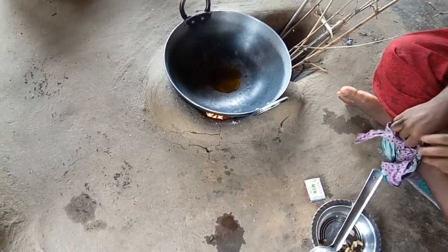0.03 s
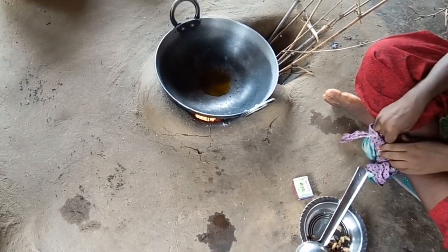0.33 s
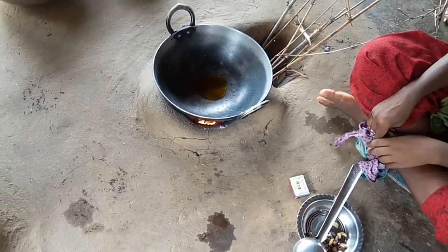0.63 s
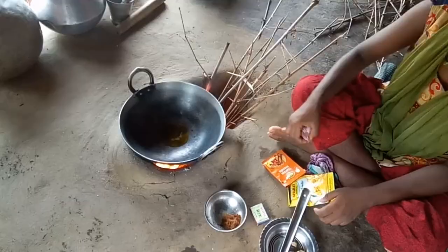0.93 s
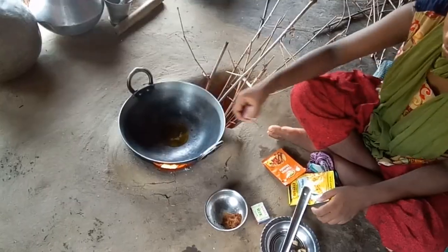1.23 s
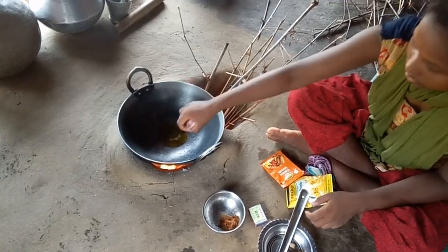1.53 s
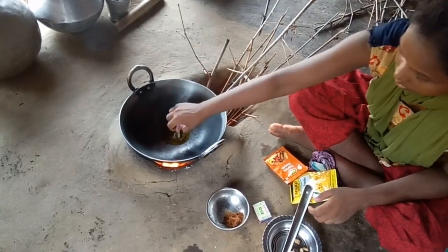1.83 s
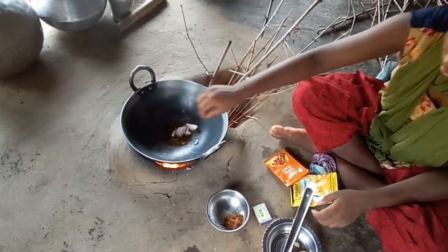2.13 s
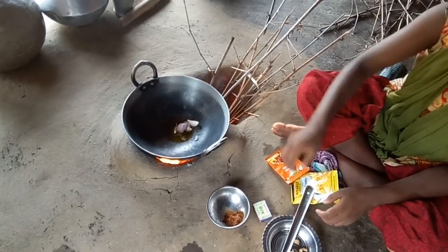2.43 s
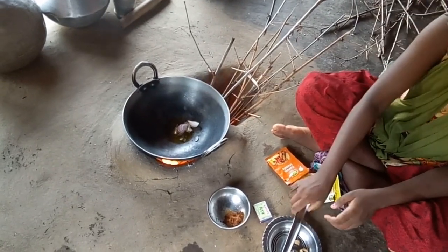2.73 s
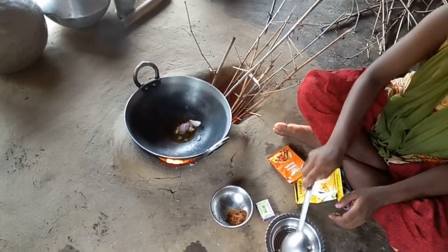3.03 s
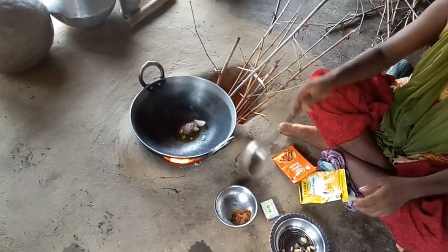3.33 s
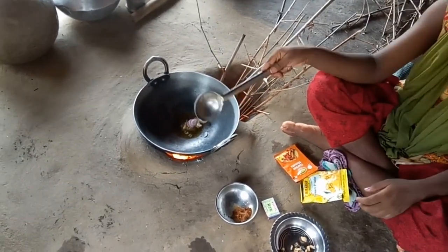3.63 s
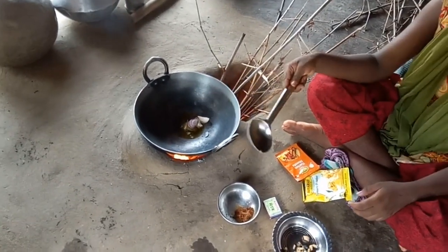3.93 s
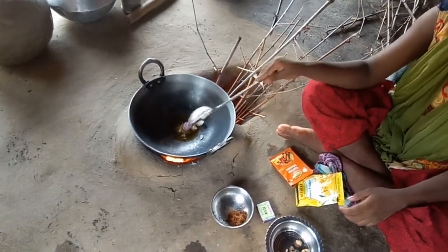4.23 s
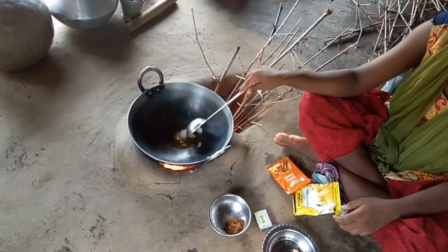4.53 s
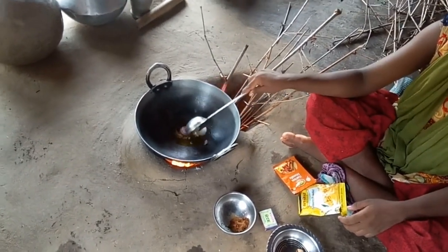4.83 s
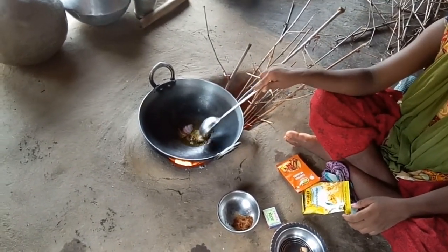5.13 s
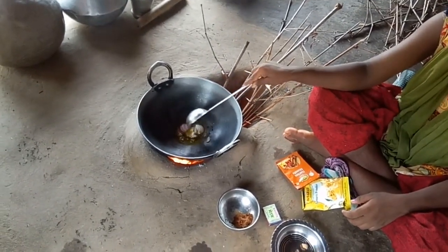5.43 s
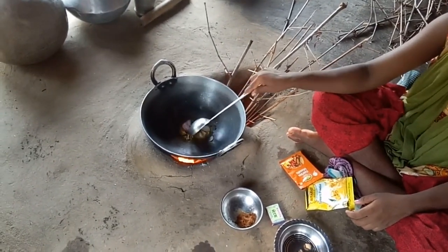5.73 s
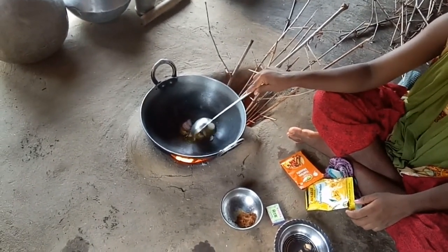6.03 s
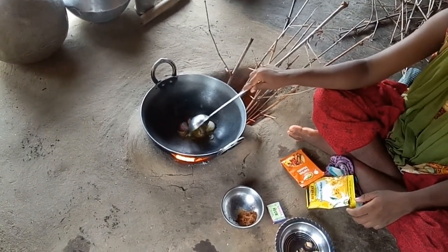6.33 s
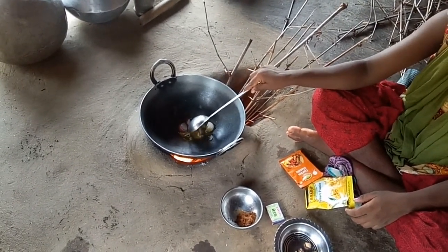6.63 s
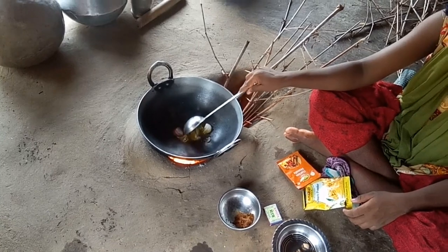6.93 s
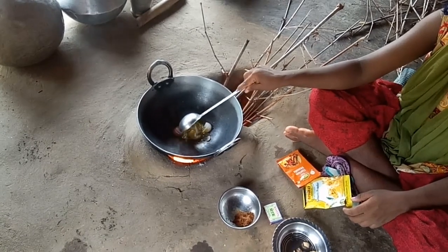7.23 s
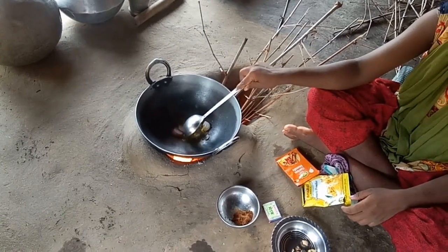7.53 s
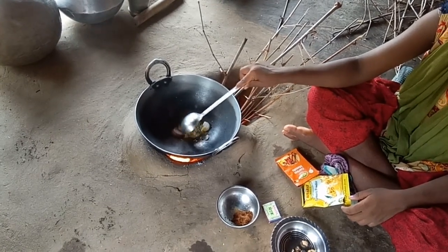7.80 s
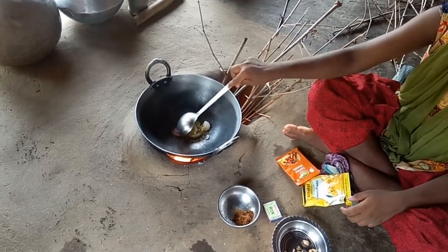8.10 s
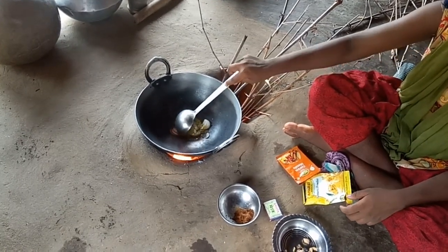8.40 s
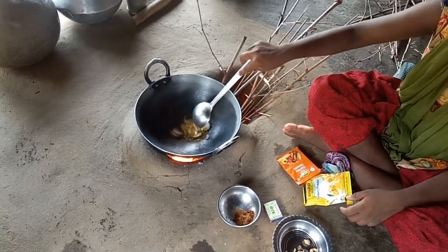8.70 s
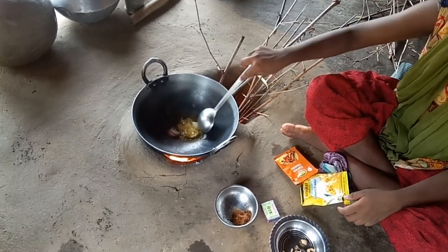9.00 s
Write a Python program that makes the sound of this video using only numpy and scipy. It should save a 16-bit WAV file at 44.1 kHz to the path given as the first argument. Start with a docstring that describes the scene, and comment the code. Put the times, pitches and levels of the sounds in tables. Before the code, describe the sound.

Faint peeping gives way to crackling, spitting oil as food fries, with light scrapes and a few clanks of a metal ladle.

```python
"""A yard, beside a wok of hot oil on a wood-fired clay stove. Chicks peep, birds whistle, insects trill.
Moist food drops in and spits: the harder the oil fries, the denser its bubbles and the louder its stray
pops. A steel ladle presses, scrapes and stirs, so the sizzle swells, and its knocks excite the modes of
wok and ladle. Over the fire's rumble lies a low, wavering hum, perhaps a distant engine or pump.
Once, before the frying begins, the level dips briefly."""
import sys
import numpy as np
from scipy import signal
from scipy.fft import rfft, irfft
from scipy.io import wavfile

SR = 44100
rng = np.random.default_rng(int(sys.argv[2]) if len(sys.argv) > 2 else 0)


def generate_wav(signal):
    """Clip the signal to [-1, 1] and save it as 16-bit WAV at the path in sys.argv[1]."""
    frames = np.transpose(np.atleast_2d(signal))
    scaled = np.clip(frames, -1, 1) * 32767
    pcm = np.round(scaled).astype(np.int16)
    wavfile.write(sys.argv[1], SR, pcm)


N = 399546
TIME = np.arange(N) / SR

# Levels in the tables are relative: each source and the mix apply further gains.
# how hard the oil fries: time_s, fine_db, coarse_db
FRYING_LEVELS = [(2.1, -42, -56.5), (2.78, -43.5, -53.5), (2.93, -43.5, -50), (3.05, -47, -58),
                 (4.5, -46.5, -62), (4.77, -43, -55.5), (4.97, -41, -55.5), (5.26, -36.5, -55.5),
                 (5.5, -39.5, -52), (5.78, -37, -50.5), (6.55, -36, -47), (7.02, -34.5, -49),
                 (7.9, -36, -52), (8.9, -34.5, -50), (9.06, -36, -56)]
# surges of bubbling as the food shifts or the ladle pushes into it: start_s, rise_s, boost_db
BUBBLING_SURGES = [(2.53, 0.023, 4), (3.28, 0.021, 4), (4.48, .09, 15), (4.81, .04, 8), (5.6, .025, 5)]
# spectra of fine sizzle, coarse bubbling and dry cracks: frequency_hz, level_db
FINE_SPECTRUM = [(1200, -33.5), (2400, -10.5), (3200, -0.5), (5200, -3.5), (6700, -3), (7700, -8),
                 (9200, -2.5), (11000, -12.5), (13000, -21), (16000, -17)]
COARSE_SPECTRUM = [(200, -18), (450, -14.5), (750, -8), (1020, -8.5), (1350, -5), (1900, 3.5), (2400, -3),
                   (3300, -17)]
CRACK_SPECTRUM = [(150, -12), (450, -12.5), (700, -1.5), (1100, -1), (2000, 6.5), (3600, 8.5), (6000, -1),
                  (10000, -0.5), (16000, -24)]
# water drops bursting in the oil: start_s, level_db, pitch_hz, click_db, ring_t60_s, spray_db
DROP_POPS = [(1.898, -20, 4870, 3, 0.025, -16), (2.112, -12.5, 5180, 7, 0.032, -27),
             (2.1855, -21.5, 8000, 12, .008, -13), (2.2181, -13.5, 3700, 13, 0.008, -25),
             (2.249, -21.5, 6700, -16, .0065, -20), (2.2903, -16, 3600, 0, 0.007, -19),
             (2.414, -19.5, 5530, 11, .01, -20), (2.453, -20, 4420, 4, 0.017, -26),
             (2.5393, -24.5, 5500, 3, .012, -16), (2.6583, -25, 4000, 14, .008, -18),
             (2.757, -29, 4500, 1, .012, -13), (3.066, -28.5, 8550, -1, 0.013, -14.5),
             (3.182, -24.5, 5460, -4, 0.0088, -21), (3.405, -27, 6200, 10, 0.0091, -16),
             (3.527, -26, 6000, 1, .01, -8.5), (4.007, -25.5, 8650, -5, .005, -14.5),
             (4.103, -27, 6000, -17, .008, -18), (4.232, -29, 5700, 14, .01, -14.5),
             (4.2836, -23, 6450, 37, .013, -19.5), (4.427, -27.5, 6020, -19, 0.034, -11.5),
             (4.722, -22, 6640, 1, 0.012, -24), (4.8698, -20.5, 7000, 8, 0.0058, -18),
             (5.055, -17, 7100, -13, 0.0082, -21), (5.39, -16.5, 5400, -12, 0.021, -22),
             (5.44, -16, 3920, 6.5, 0.034, -28), (5.6118, -17, 5570, -1, 0.009, -13),
             (6.0009, -13.5, 4600, -9, 0.011, -16.5), (6.053, -14.5, 3250, -4, 0.035, -12.5),
             (6.1182, -13.5, 5200, 2, 0.0073, -19), (6.3432, -15.5, 4520, -3, 0.013, -15.5),
             (6.387, -17, 4800, -3, 0.011, -24), (6.667, -12.5, 3900, 0, 0.014, -18),
             (6.7892, -17, 4560, 9, 0.014, -34), (6.82, -15, 4570, 4, 0.014, -22),
             (7.195, -16, 3280, -2, 0.03, -23), (7.607, -17.5, 4220, -2, .015, -15),
             (8.15, -15, 5250, 1, 0.04, -21), (8.182, -19, 5500, -10, .012, -15),
             (8.865, -18.5, 4100, -8, .018, -15)]
# wet squelches of the food and a few short, lower ladle scrapes: middle_s, length_s, pitch_hz, level_db
SQUELCHES_AND_SCRAPES = [(2.264, .028, 7000, -35), (3.815, 0.033, 5760, -41.5), (4.288, 0.024, 6800, -27),
                         (4.933, 0.049, 4670, -34), (5.064, 0.037, 6500, -29), (4.704, 0.027, 6360, -34),
                         (5.738, .08, 6300, -31), (5.96, .03, 5700, -29), (5.252, 0.044, 5160, -33),
                         (5.649, 0.038, 4800, -30), (6.252, 0.051, 5340, -29), (6.44, 0.02, 1900, -35.5),
                         (6.691, .047, 3560, -27), (6.983, 0.063, 4630, -27), (7.064, 0.024, 2300, -36),
                         (7.156, .04, 3870, -30.5), (7.29, .035, 5140, -30.5), (7.342, .025, 5100, -28),
                         (7.548, 0.025, 3500, -22), (7.592, 0.055, 3580, -26.5), (7.783, 0.023, 4640, -24),
                         (8.023, 0.06, 4860, -31), (8.346, 0.019, 4140, -23), (8.389, .04, 4950, -31),
                         (8.642, 0.034, 4400, -30), (8.699, .037, 4930, -27.5), (8.885, 0.019, 2000, -36)]
# dry, broadband cracks: start_s, level_db
DRY_CRACKS = [(2.218, -18.5), (2.5448, -17), (2.606, -19.5), (2.6593, -15), (2.8107, -11.5), (4.1213, -23),
              (5.0717, -13.5), (5.665, -24), (6.79, -24), (6.8937, -18), (7.066, -29), (7.3248, -11.5),
              (7.9059, -12), (8.283, -13.5), (9.0432, -20.5)]
# bright snaps of oil film: start_s, level_db, pitch_hz
FILM_SNAPS = [(2.025, -21, 7500), (2.171, -27, 14100), (2.196, -18, 8000), (2.476, -23, 7900),
              (2.602, -19, 7700), (2.625, -19, 6000), (2.708, -16.5, 11000), (2.869, -19, 6300),
              (2.928, -21, 6500), (3.0, -25, 9500), (3.294, -25.5, 3900), (3.316, -29, 5300),
              (3.434, -32, 5500), (4.02, -31, 8100), (4.174, -24.5, 7300), (4.471, -23.5, 8300),
              (4.481, -24, 8800), (4.804, -20, 7300), (4.827, -19, 6000), (5.3664, -17, 5500),
              (6.1646, -8, 7000), (6.5643, -18, 5100), (6.9686, -15, 5000), (7.92, -18, 5700),
              (8.0498, -16, 5700), (8.551, -20, 5600)]
# resonances of the wok's bowl: centre_hz, width_hz, gain_db
BOWL_RESONANCES = [(662, 67, -4.5), (791, 51, -2.5), (1297, 156, -0.5), (3700, 150, -11), (4560, 220, -3),
                   (5340, 590, -0.5), (6450, 530, -5)]
# knocks of steel on wok or plate:
# start_s, wok_db, ladle_db, favoured_wok_hz, favoured_ladle_hz, rebound_delay_s, rebound_db
LADLE_KNOCKS = [(2.811, -50, -52, 662, 3700, .005, -15), (3.573, -81, -33.5, 800, 3790, .0022, -6),
                (6.5944, -35.5, -33, 960, 3400, .008, -22), (7.673, -27.5, -29.5, 1290, 3660, .0043, -4),
                (8.9425, -31.5, -30.5, 1684, 3980, .0052, -4), (8.992, -74, -40.5, 1690, 3300, .0055, -5)]
# modes of the wok, damped by its clay seat, and of the hand-held ladle: pitch_hz, level_db, t60_s
WOK_MODES = [(169, -10.5, 0.053), (290, -6, 0.026), (427, -13.5, .06), (662, -2.5, .045), (735, -1, 0.026),
             (796, 2, 0.046), (880, -5, .02), (960, -12, .12), (1080, -7, .025), (1280, -3, .04),
             (1340, -6.5, .035), (1517, -1.5, .04), (1630, 4, 0.015), (1703, -10, 0.12), (1727, -4.5, .05),
             (1936, -3.5, 0.036), (2590, -3.5, 0.038)]
LADLE_MODES = [(3160, 2, .045), (3275, 5, 0.029), (3430, 4, .022), (3700, 2, 0.043), (3820, 7.5, 0.019),
               (4100, -8, 0.12), (4540, 0, .022), (4800, 6, 0.028), (6640, -4, .05), (7350, -1, 0.02)]
# spectrum of the wok jolting in its seat: frequency_hz, level_db
SEAT_SPECTRUM = [(130, -10), (250, -2), (380, -4.5), (550, -2), (750, 1.5), (1050, -7.5), (1600, -2.5),
                 (2800, -13.5), (4000, -22)]
# modes of a steel plate: centre_hz, width_hz, gain_db
PLATE_MODES = [(1976, 10, -4), (3410, 10, 0), (3720, 40, 0), (4720, 20, -1), (5150, 20, -5), (5930, 15, 0),
               (6500, 260, -11)]
# joint strength of the fire's rumble and the hum: time_s, level_db
RUMBLE_LEVELS = [(0.0, -69.5), (0.48, -74), (1.16, -69.5), (1.34, -65.5), (1.82, -65.5), (2.07, -62.5),
                 (4.77, -62.5), (5.02, -60), (5.7, -65), (6.0, -67), (6.4, -67), (7.33, -66.5), (7.55, -59),
                 (7.72, -60), (7.9, -64.5), (8.58, -60), (9.06, -62)]
# spectrum of the flames: frequency_hz, level_db
FLAME_SPECTRUM = [(25, -12), (55, -10), (85, -6), (115, -2), (143, -6.5), (175, -0.5), (220, -6.5),
                  (310, -10.5), (420, -21), (800, -47)]
# pitches of a low, wavering hum, perhaps a distant engine or pump: centre_hz, width_hz, gain_db
HUM_BANDS = [(94.5, 5.2, 5), (130.5, 4.4, 15), (143.9, 5.3, 15.5), (159.2, 5.3, 8), (176.3, 4.5, 8),
             (337, 25, -0.5)]
# falling peeps of chicks, flatter whistles of far birds: middle_s, length_s, start_pitch_hz, level_db
CHICK_PEEPS = [(0.0, 0.057, 3070, -51.5), (.05, 0.091, 2640, -62), (.228, 0.063, 3216, -49.5),
               (.445, .09, 3240, -55), (.704, 0.098, 3410, -55.5)]
BIRD_WHISTLES = [(.362, 0.03, 3170, -60.5), (.588, 0.059, 2040, -56), (1.223, 0.16, 1713, -66.5),
                 (1.485, 0.23, 3000, -67.5), (1.655, 0.18, 4030, -66.5)]
# partials of a raspy call, whose cycles alternate strong and weak: pitch_ratio, level_db
RASP_PARTIALS = [(.5, -19), (1.5, 0.5), (2, -0.5), (2.5, -11), (3, -7)]
# soft low blips and duller bumps: middle_s, pitch_hz, level_db
SOFT_BLIPS = [(3.712, 600, -58), (3.845, 513, -60.5), (3.885, 674, -66), (3.932, 590, -61)]
DULL_BUMPS = [(1.4, 248, -59.5), (1.95, 328, -59.5), (2.635, 188, -50), (3.24, 318, -59.5),
              (3.38, 320, -62), (5.64, 318, -59.5), (5.69, 180, -52), (6.0, 290, -55), (6.9, 295, -58.5)]
# trills of insects: centre_hz, width_hz, level_db, throb_hz, start_s
INSECT_TRILLS = [(9500, 640, -80.5, 7.4, 0), (8500, 110, -91, 7.3, 0.76)]
# strength of the yard's ambient noise: time_s, level_db
YARD_LEVELS = [(0, -71.5), (.9, -69.5), (1.1, -71.5), (1.8, -69), (9.06, -77)]
# spectrum of that noise: frequency_hz, level_db
YARD_SPECTRUM = [(180, -14), (300, -3.5), (1810, -9.5), (2930, -6), (3520, -11.5), (5430, -7),
                 (7820, -19.5), (9550, -14), (10600, -24), (15000, -31), (16000, -28)]
# spectral weighting of the stereo side signal: frequency_hz, gain_db
SIDE_SPECTRUM = [(3000, -79), (4200, -69), (5200, -66), (8000, -59), (16000, -30)]

DRIPS_S, LANDS_S, STIR_S = 1.81, 1.936, 4.5  # water drips in, the food lands, stirring begins


def sizzle(base_per_s=5000, base_db=-36, doubling_db=5.5, crisp_db=5.5, dulling_db_per_s=1):
    """Bubble resonance: over a steam hiss, bubbles burst in clumps; small ones ring high, large low."""
    fine_db, coarse_db = frying_levels()
    clumping = from_db(1.67 * drift(22))
    per_s = base_per_s * 2 ** ((fine_db - base_db) / doubling_db) * clumping
    hiss = from_db(-5) * rng.standard_normal(N)
    small = bubbles(grains(per_s * 1.5, spread_db=4.5), 2065, 13950, q=8.2, sizes=20)
    ticks = from_db(-4) * rms_one(grains(per_s * .37, spread_db=2))
    spits = from_db(-4) * bubbles(grains(per_s * .02, spread_db=1.5), 3010, 7020, q=17, sizes=16)
    spits *= from_db(-10 * (TIME < STIR_S))
    crackle = from_db(-6.5) * rms_one(grains(110, spread_db=2.5))
    large = bubbles(grains(per_s * .6, spread_db=3.5), 540, 2770, q=3, sizes=12)
    fine = rms_one(colour(small + crackle + ticks + hiss, FINE_SPECTRUM))
    coarse = rms_one(colour(large + ticks + hiss, COARSE_SPECTRUM))
    # once stirred, the food slowly covers the oil and dulls the treble
    treble = signal.sosfilt(signal.butter(1, 9000, "high", fs=SR, output="sos"), fine)
    treble_gain = from_db(crisp_db - dulling_db_per_s * np.maximum(TIME - STIR_S, 0))
    fine = fine + (treble_gain - 1) * treble + spits
    return from_db(fine_db) * fine + from_db(coarse_db + .5) * coarse


def frying_levels(drips_db=-6.5, flare_db=8.5, flare_s=.073, surge_decay_s=.125, fine_share=.54):
    """Boiling sets the fine and coarse levels (dB): first drips, a flare as food lands, then surges."""
    wet = np.clip((TIME - DRIPS_S) / .02, 1e-4, 1)
    landed = np.clip((TIME - LANDS_S) / .035, 0, 1)
    onset = 20 * np.log10(wet) + drips_db * (1 - landed)
    flare = flare_db * landed * np.exp(-np.abs(TIME - LANDS_S) / flare_s)
    surge = 0
    for s, rise_s, db in BUBBLING_SURGES:
        subsiding = np.exp(-np.maximum(TIME - s - rise_s, 0) / surge_decay_s)
        surge += db * np.clip((TIME - s) / rise_s, 0, 1) * subsiding
    fine, coarse = curves(FRYING_LEVELS)
    return fine + onset + flare + fine_share * surge, coarse + onset - flare + surge


def bubbles(clicks, low_hz, high_hz, q, sizes):
    """Impulse excitation: each click rings one bubble, whose randomly chosen size sets its pitch."""
    size = rng.integers(0, sizes, N)
    pitches = np.geomspace(low_hz, high_hz, sizes)
    return rms_one(sum(resonance(clicks * (size == k), hz, hz / q) for k, hz in enumerate(pitches)))


def pops(level_db=4.5, stray_click_db=10, stray_t60=.011, stray_spray_db=-13, spray_t60=.064):
    """Cavity resonance: a drop bursts with a click, its cavity rings, and a spray of droplets follows."""
    out, t = np.zeros(N), np.arange(4096) / SR
    lesser = strays(LANDS_S, per_s=6, over_db=10, spread_db=9.5)
    lesser = [(*row, stray_click_db, stray_t60, stray_spray_db) for row in lesser]
    for s, db, hz, click_db, t60, spray_db in DROP_POPS + lesser:
        cavity = np.sin(2 * np.pi * hz * t) * decay(t, t60)
        rupture = (t == 0) + 1.1 * rng.standard_normal(len(t)) * decay(t, .0027)
        click = resonance(colour(rupture, FINE_SPECTRUM), hz, 2800)
        burst = peak_one(cavity + 2 * from_db(click_db) * peak_one(click))
        droplets = double_resonance(rng.standard_normal(len(t)) ** 3, hz, 5300)
        spray = from_db(spray_db + 1.5) * rms_one(droplets) * decay(t, spray_t60)
        add(out, s + .001019, from_db(db + level_db) * (burst + spray))
    return low_cut(out, hz=1200)


def squelches_and_scrapes(level_db=1.5, q=3.6, rough_db=5, stray_length_s=.036):
    """Band-limited noise in sputtering swells: wet squelches of food and a few lower ladle scrapes."""
    out = np.zeros(N)
    lesser = strays(STIR_S, per_s=3, over_db=3, spread_db=2, low_hz=3500, high_hz=6030)
    lesser = [(s, stray_length_s, hz, db) for s, db, hz in lesser]
    for s, length_s, hz, db in SQUELCHES_AND_SCRAPES + lesser:
        swell = np.hanning(round(length_s * SR))
        sputter = rng.standard_normal(8192) * from_db(rough_db * np.repeat(rng.standard_normal(256), 32))
        band = resonance(resonance(sputter, hz, hz / q), hz, hz / 2)
        add(out, s - length_s / 2, from_db(db + level_db) * swell * rms_one(band[:len(swell)]))
    return out


def cracks(level_db=2.5):
    """A brief impulse has a broad spectrum: dry cracks in the oil reach down into the middle range."""
    out, t = np.zeros(N), np.arange(1024) / SR
    lesser = strays(LANDS_S, per_s=2.5, over_db=12.5, spread_db=10)
    for s, db in DRY_CRACKS + list(lesser[:, :2]):
        impulse = (t == 0) + .15 * rng.standard_normal(len(t)) * decay(t, .005)
        add(out, s + .001026, from_db(db + level_db) * peak_one(colour(impulse, CRACK_SPECTRUM)))
    return out


def snaps(level_db=3, width_hz=6000, tear_t60=.0074):
    """Film rupture: thin films of oil snap, each a bright tick with a brief tearing tail."""
    out, t = np.zeros(N), np.arange(512) / SR
    lesser = strays(LANDS_S, per_s=20, over_db=10.5, spread_db=8, low_hz=3000, high_hz=9800)
    for s, db, hz in FILM_SNAPS + list(lesser):
        rupture = (t == 0) + .3 * rng.standard_normal(len(t)) * decay(t, tear_t60)
        add(out, s, from_db(db + level_db) * peak_one(resonance(rupture, hz, width_hz)))
    return out


def strays(start_s, per_s, over_db, spread_db, low_hz=3600, high_hz=8000):
    """A random point process of bursts that grow louder with the sizzle: time_s, level_db, pitch_hz."""
    when, size, pitch, chance = rng.random((256, 4)).T
    span_s = TIME[-1] - start_s
    s = start_s + when * span_s
    db = np.interp(s, TIME, frying_levels()[0]) + over_db + spread_db * (size - .5)
    hz = low_hz * (high_hz / low_hz) ** pitch
    return np.transpose([s, db, hz])[chance < per_s * span_s / len(s)]


def ladle_knocks(rebound_thud_db=-12):
    """Impact: each knock rings wok and ladle, crushes food, jolts the wok's seat and rebounds once."""
    out, t = np.zeros(N), np.arange(SR // 2) / SR
    for s, wok_db, ladle_db, wok_hz, ladle_hz, rebound_s, rebound_db in LADLE_KNOCKS:
        for after_s, db, thud_db in (0, 0, 0), (rebound_s, rebound_db, rebound_thud_db):
            noise = rng.standard_normal((3, len(t)))
            grit = from_db(-1) * rms_one(colour(noise[0], CRACK_SPECTRUM)) * decay(t, .072)
            jolt = from_db(2.5) * rms_one(colour(noise[1], SEAT_SPECTRUM)) * decay(t, .058)
            scuff = rms_one(resonance(noise[2], 4900, 2300)) * decay(t, .033)
            wok = struck(WOK_MODES, t, wok_hz, favour_db=4.5, reach=.035, sustain=.64)
            ladle = struck(LADLE_MODES, t, ladle_hz, favour_db=7.5, reach=.052, sustain=.11)
            thud = from_db(wok_db + thud_db) * low_cut(wok + grit + jolt, hz=170)
            ring = from_db(ladle_db) * low_cut(ladle + scuff, hz=2370)
            add(out, s + after_s, from_db(db) * (thud + ring))
    return out


def struck(modes, t, favoured_hz, favour_db, reach, sustain):
    """Modal superposition: the modes that the point of contact favours ring louder and longer."""
    out = 0
    for k, (hz, db, t60) in enumerate(modes):
        favoured = np.exp(-(np.log(hz / favoured_hz) / reach) ** 2)
        strength = (-1) ** k * from_db(db + rng.normal(0, 1) + favour_db * favoured)
        out += strength * np.sin(2 * np.pi * hz * t) * decay(t, t60 * (1 + sustain * favoured))
    return out


def ladle_slide(start_s=2.884, level_db=-31, attack_s=.005, t60=.18):
    """Friction: the ladle slides off the steel plate, exciting its modes, and the rubbing dies away."""
    out, t = np.zeros(N), np.arange(SR // 2) / SR
    friction = grains(3000, spread_db=2)
    scrape = from_db(-21) * resonance(friction, 4800, 5000)
    slide = rms_one(resonators(friction, PLATE_MODES) + scrape)
    envelope = np.minimum(t / attack_s, 1) * decay(t, t60)
    add(out, start_s, from_db(level_db) * slide[-len(t):] * envelope)
    return out


def fire_and_hum(level_db=2.5, flutter_db=2, hum_share=.74):
    """Beating: a low hum of close pitches, perhaps a far engine or pump, wavers over the fire's rumble."""
    strength_db, = curves(RUMBLE_LEVELS)
    rumble = colour(rng.standard_normal(N), FLAME_SPECTRUM)
    hum_gain = from_db(hum_share * (strength_db - strength_db.max()))
    hum = hum_gain * resonators(rumble, HUM_BANDS)
    return from_db(strength_db + level_db + flutter_db * drift(25)) * rms_one(rumble + hum)


def birds(bend=1.6, hoarseness=1.35):
    """Period doubling: half-order partials roughen each call, a wavering tone that falls ever faster."""
    out = np.zeros(N)
    waver = 1 + .035 * drift(260)
    tremble = from_db(2.5 * drift(150))
    roughness = 1 + hoarseness * drift(350)
    for calls, fall, rasp_db in (CHICK_PEEPS, .39, -18.5), (BIRD_WHISTLES, .089, -34):
        for s, length_s, hz, db in calls:
            progress = np.linspace(0, 1, round(length_s * SR))
            now = round(s * SR) + np.arange(len(progress))
            pitch_hz = hz * (1 - fall * progress ** bend) * waver[now]
            phase = 2 * np.pi * np.cumsum(pitch_hz) / SR
            rasp = sum(from_db(rasp_db + part_db) * np.sin(k * phase) for k, part_db in RASP_PARTIALS)
            tone = np.sin(phase) + roughness[now] * rasp
            call = from_db(db) * tone * tremble[now] * np.sin(np.pi * progress) ** 2
            already_sung = max(0, round((length_s / 2 - s) * SR))
            add(out, s - length_s / 2, call[already_sung:])
    return out + reflections(out, t60=.2, wet_db=-4)


def blips(length_s=.035, width_hz=140):
    """Narrow-band noise has a vague pitch: short swells of it are heard as dull blips and bumps."""
    out, swell = np.zeros(N), np.hanning(round(length_s * SR))
    for s, hz, db in SOFT_BLIPS + DULL_BUMPS:
        band = double_resonance(rng.standard_normal(SR // 4), hz, width_hz)
        add(out, s - length_s / 2, from_db(db) * swell * rms_one(band[-len(swell):]))
    return out


def insects(throb_depth=.56):
    """Stridulation: far insects make narrow bands of noise that throb in amplitude."""
    out = np.zeros(N)
    for hz, width_hz, db, throb_hz, start_s in INSECT_TRILLS:
        band = rms_one(double_resonance(rng.standard_normal(N), hz, width_hz))
        throb = 1 + throb_depth * np.sin(2 * np.pi * throb_hz * TIME + drift(6.1))
        out += from_db(db) * band * throb * (TIME > start_s)
    return out


def yard_air():
    """Ambient noise: the air of the yard is a faint broadband hush of slowly varying level."""
    level_db, = curves(YARD_LEVELS)
    return from_db(level_db) * rms_one(colour(rng.standard_normal(N), YARD_SPECTRUM))


def reflections(x, t60, wet_db, gap_s=.0017):
    """Reverberation: dense echoes from the ground and nearby walls decay exponentially."""
    t = np.arange(SR // 2) / SR
    tail = rng.standard_normal(len(t)) * decay(t, t60) * (t > gap_s)
    return from_db(wet_db) * signal.oaconvolve(x, tail / np.linalg.norm(tail))[:N]


def grains(per_s, spread_db):
    """Shot noise: random clicks of either sign and very uneven size."""
    out = np.zeros(N)
    at = np.flatnonzero(rng.random(N) < per_s / SR)
    size = from_db(spread_db * np.minimum(rng.exponential(1, N)[at], 5))
    out[at] = size * np.sign(rng.random(N)[at] - .5)
    return out


def drift(rate_hz, step=40):
    """Low-passed noise: a slow random fluctuation with rms near 1."""
    pole = np.exp(-2 * np.pi * rate_hz * step / SR)
    noise = rng.standard_normal(N // step + 2002)
    slow = signal.lfilter([1], [1, -2 * pole, pole * pole], noise)[2000:]
    return np.interp(np.arange(N) / step, np.arange(len(slow)), rms_one(slow))


def colour(x, spectrum, size=4096):
    """Minimum-phase filtering to a spectrum, falling 12 dB per octave beyond its ends."""
    hz, db = np.transpose(spectrum)
    log_hz = np.log(np.maximum(np.arange(size // 2 + 1), .5) * SR / size)
    skirts = np.maximum(np.log(hz[0]) - log_hz, 0) + np.maximum(log_hz - np.log(hz[-1]), 0)
    cepstrum = irfft(np.log(from_db(np.interp(log_hz, np.log(hz), db))) - 2 * skirts)
    cepstrum[1:size // 2] *= 2  # folding the cepstrum makes the response causal
    cepstrum[size // 2 + 1:] = 0
    return signal.oaconvolve(x, irfft(np.exp(rfft(cepstrum))))[:len(x)]


def resonance(x, hz, width_hz):
    """A damped oscillator: a band-pass with unit gain at its peak."""
    r = np.exp(-np.pi * width_hz / SR)
    feedback = [1, -2 * r * np.cos(2 * np.pi * hz / SR), r * r]
    return signal.lfilter(np.array([1, 0, -1]) * (1 - r * r) / 2, feedback, x + 1e-18)


def double_resonance(x, hz, width_hz):
    """Two equal resonators in series give steeper skirts."""
    return resonance(resonance(x, hz, width_hz), hz, width_hz)


def resonators(x, modes):
    """Resonators in parallel: their responses add."""
    return sum(from_db(db) * resonance(x, hz, width_hz) for hz, width_hz, db in modes)


def low_cut(x, hz):
    """Radiation efficiency: a small body radiates little bass."""
    return signal.sosfilt(signal.butter(2, hz, "high", fs=SR, output="sos"), x + 1e-18)


def decay(t, t60):
    """Exponential damping by 60 dB in t60 seconds."""
    return np.exp(-np.log(1000) * t / t60)


def from_db(db):
    """Decibels to amplitude ratio."""
    return 10 ** (np.asarray(db) / 20)


def rms_one(x):
    """Normalisation to rms 1."""
    return x / np.sqrt(np.mean(x ** 2) + 1e-20)


def peak_one(x):
    """Normalisation to peak 1."""
    return x / np.abs(x).max()


def curves(rows):
    """Linear interpolation of each level column at every sample."""
    s, *columns = np.transpose(rows)
    return [np.interp(TIME, s, column) for column in columns]


def add(out, start_s, sound):
    """Superposition of a sound from start_s onward."""
    at = max(0, round(start_s * SR))
    out[at:at + len(sound)] += sound[:max(0, N - at)]


def scene():
    """Superposition: frying resonates in the bowl and joins the yard, nearly mono but for the treble."""
    oil = sizzle() + pops() + squelches_and_scrapes() + cracks() + snaps()
    oil = from_db(-7.5) * (oil + resonators(oil, BOWL_RESONANCES))
    cooking = oil + ladle_knocks() + ladle_slide()
    echoes = reflections(cooking, t60=.027, wet_db=-13.5) + reflections(cooking, t60=.19, wet_db=-10.5)
    mid = cooking + echoes + yard_air() + fire_and_hum() + birds() + insects() + blips()
    side = colour(reflections(mid, t60=.01, wet_db=0, gap_s=0), SIDE_SPECTRUM)
    return np.array([mid + side, mid - side])


def record(dry, dip_s=.95, dip_db=-35, recovery_s=.32, cutoff_hz=15600):
    """Attenuation and band-limiting: the level dips once and fades back; the highest treble is cut."""
    recovery = np.minimum(from_db(dip_db) + (TIME - dip_s) / recovery_s, 1)
    gain = np.where(TIME < dip_s, 1, recovery)
    low_pass = signal.firwin(201, cutoff_hz, fs=SR)
    return signal.oaconvolve(dry * gain, low_pass[None], "same", axes=1)


dry = scene()
out = record(dry)
generate_wav(out)
```